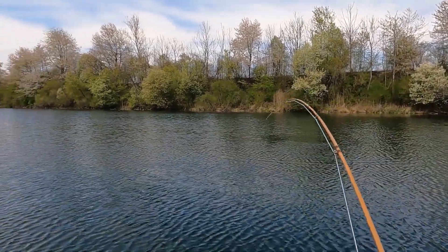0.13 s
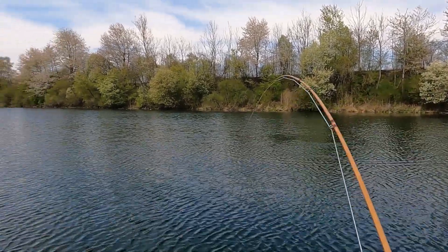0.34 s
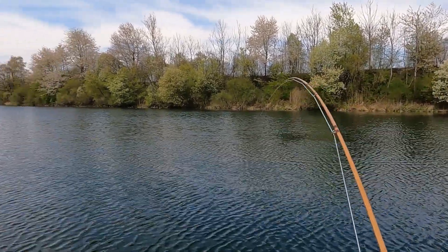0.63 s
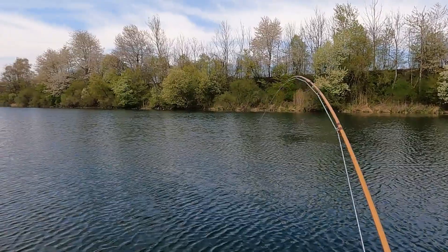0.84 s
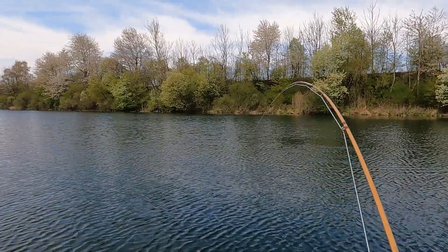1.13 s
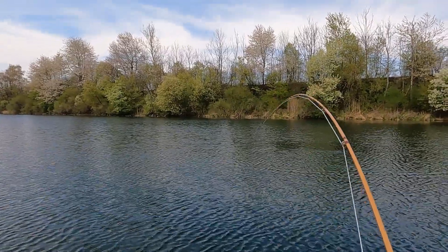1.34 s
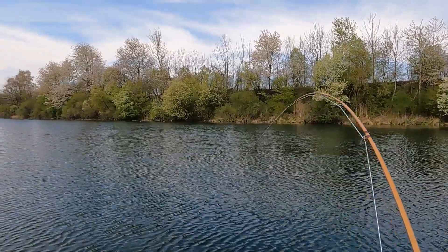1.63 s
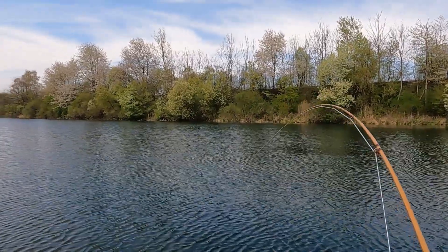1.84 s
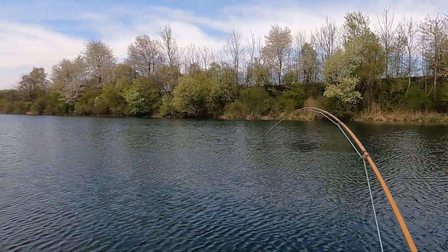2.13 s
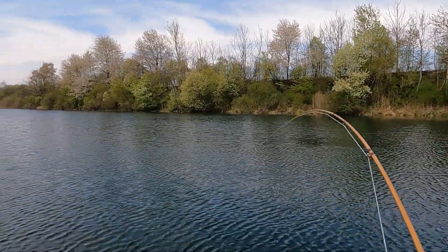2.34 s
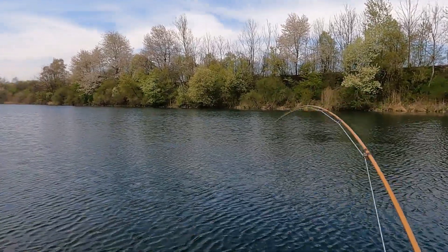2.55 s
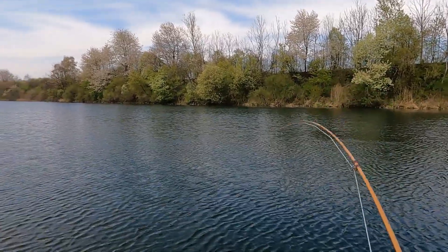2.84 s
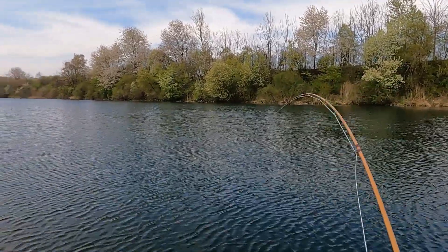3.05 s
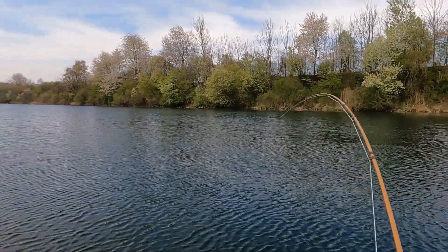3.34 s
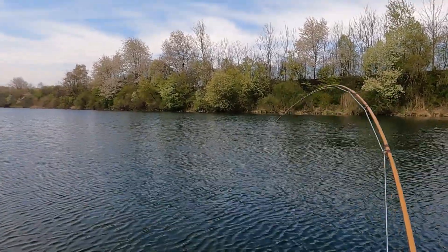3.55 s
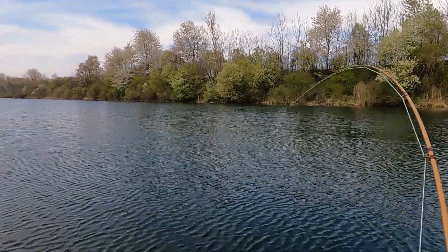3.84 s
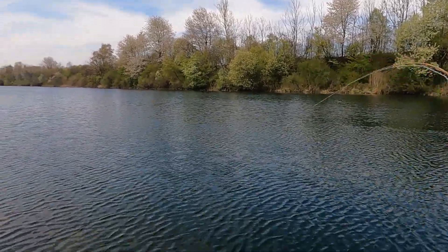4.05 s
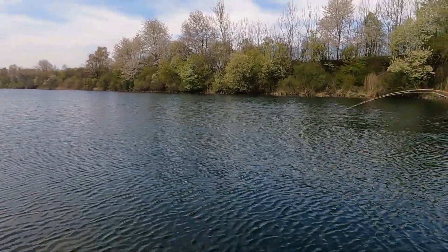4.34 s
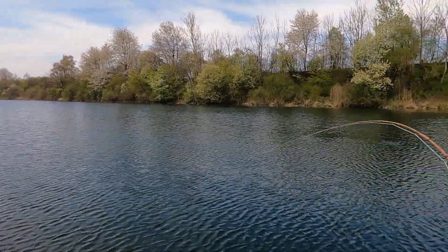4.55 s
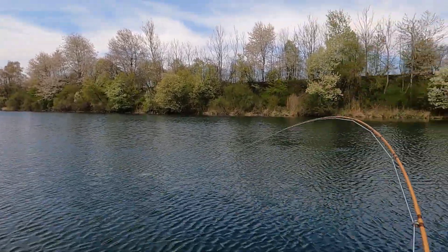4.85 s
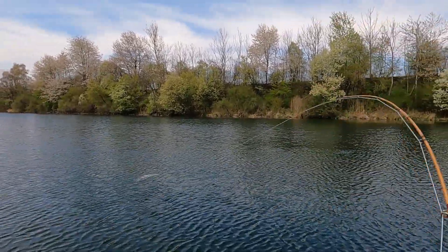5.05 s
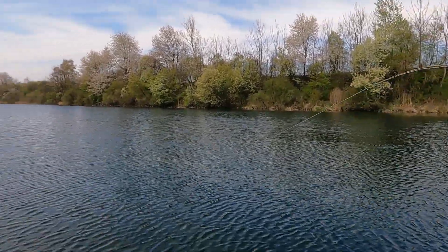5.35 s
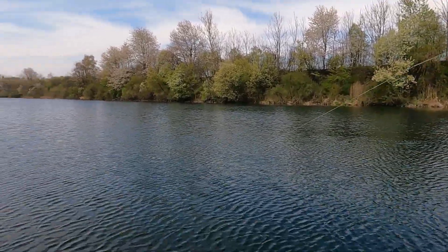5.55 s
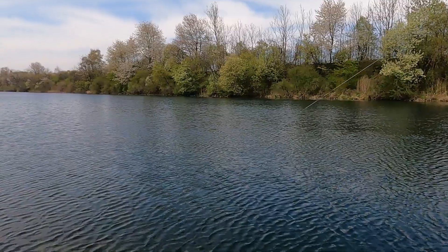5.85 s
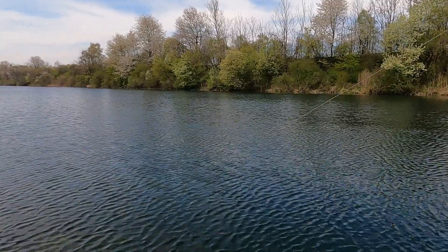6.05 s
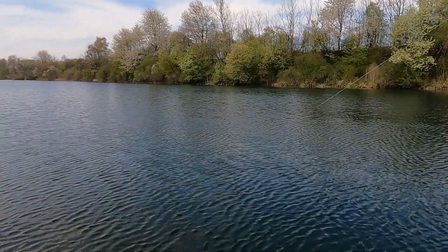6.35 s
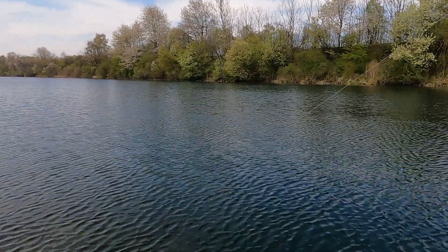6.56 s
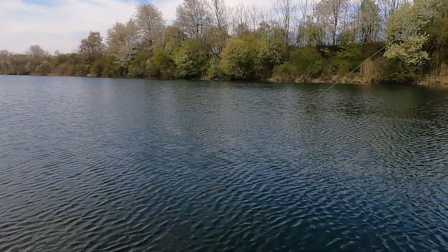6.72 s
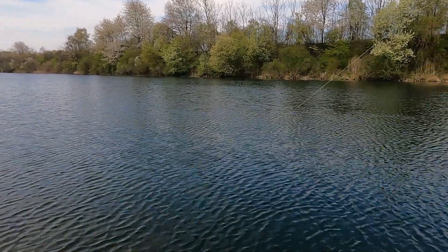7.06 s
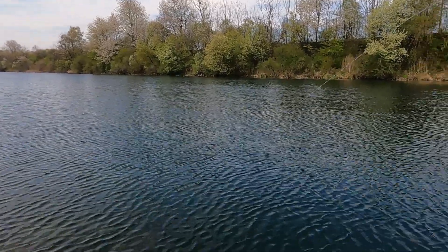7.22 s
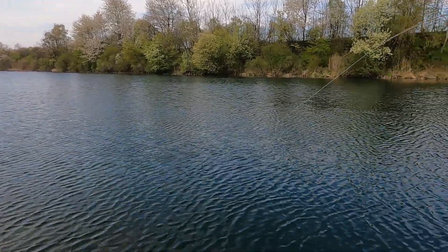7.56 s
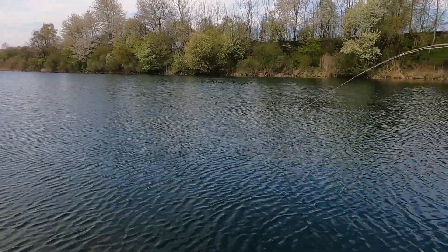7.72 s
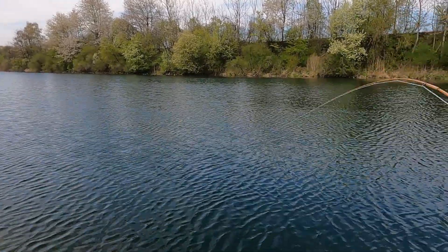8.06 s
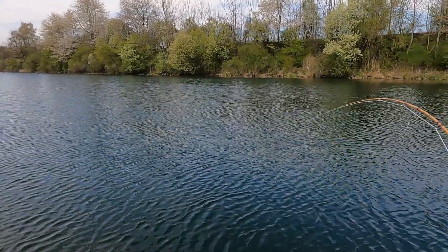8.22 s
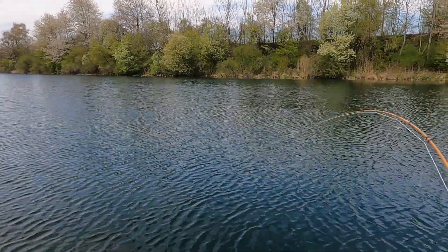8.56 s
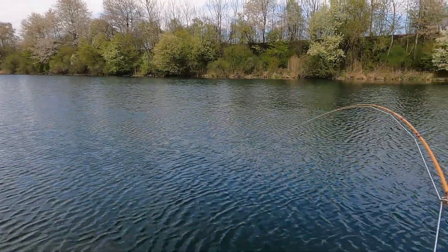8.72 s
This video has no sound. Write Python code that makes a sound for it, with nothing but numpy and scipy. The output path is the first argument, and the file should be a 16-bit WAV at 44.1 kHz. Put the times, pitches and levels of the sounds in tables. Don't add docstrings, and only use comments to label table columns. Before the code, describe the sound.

A dry, bright clicking reel at arm's length surges and eases as a hooked fish takes line. The long purr breaks into lone clicks, then a quieter gap of rustling sleeve and light wind. The reel runs again for nearly two seconds and falters. Isolated ticks and a bump on the microphone housing end it, with wind rumbling low. Open air, almost no echo.

```python
import sys
import numpy as np
from scipy import signal
from scipy.io import wavfile

SR = 44100
rng = np.random.default_rng(int(sys.argv[2]) if len(sys.argv) > 2 else 0)


def materialize(psi):
    bounded = np.clip(np.atleast_2d(psi).T, -1, 1)
    quanta = np.round(bounded * 32767).astype(np.int16)
    wavfile.write(sys.argv[1], SR, quanta)


def magnitude_from_level(level_db):
    exponent = np.asarray(level_db, float) / 20
    return 10 ** exponent


N = 392033

# start in seconds, then the level in dB
LONE_CLICKS = [(3.1774, -31.5, -36, -28, -30.5), (3.2211, -27, -33, -25, -37),
               (3.3632, -27.5, -33, -29.5, -31.5), (3.4884, -29, -36, -28.5, -30),
               (3.5988, -30, -33, -27.5, -30.5), (4.7159, -32.5, -34.5, -36.5, -32),
               (5.8517, -25.5, -31, -32.5, -33), (5.986, -27, -33, -31, -31),
               (6.1397, -24.5, -33, -31, -34.5), (8.4911, -28.5, -31.5, -29.5, -33.5),
               (8.6051, -33, -32.5, -32, -31), (8.6528, -33, -32, -30, -28.5),
               (8.6891, -28.5, -37, -29, -32.5), (8.725, -26.5, -32.5, -27.5, -35.5)]
# start in seconds, teeth passed, teeth per second at the start,
# lateness of the fastest moment [exponent].
FIRST_TUGS = [(0.0015, 9, 58, 1.15), (0.1364, 10, 44, 0.77), (0.2806, 8, 62, 0.67), (0.4039, 9, 56, 0.82),
              (0.5361, 13, 55, 1.02), (0.7077, 8, 77, 1.21), (0.8032, 12, 66, 0.72), (0.9518, 13, 30, 0.8),
              (1.1039, 9, 62, 1.23), (1.2211, 9, 58, 1.02), (1.3388, 10, 58, 0.61), (1.4901, 13, 41, 0.53),
              (1.6753, 18, 70, 0.67), (1.9179, 15, 54, 1.06), (2.1159, 13, 66, 0.75), (2.2789, 7, 67, 0.4),
              (2.3826, 17, 64, 1.26), (2.6179, 12, 55, 1.28), (2.7844, 14, 73, 0.74), (2.9701, 0, 44, 2.49)]


def rms_one(x):
    return x / np.sqrt(np.mean(x ** 2) + 1e-20)


def in_time(rows):
    s, *columns = np.transpose(rows)
    return [np.interp(np.arange(N) / SR, s, column) for column in columns]


def at_hz(points, hz):
    table_hz, value = np.array(points)[:, 0], np.array(points)[:, 1]
    return np.interp(np.log(hz), np.log(table_hz), value)


def drift(rate):
    pole = np.exp(-80 * np.pi * rate / SR)
    white = rng.standard_normal(N // 40 + 2002)
    slow = signal.lfilter([1], [1, -2 * pole, pole * pole], white)[2000:]
    return np.interp(np.arange(N) / 40, np.arange(len(slow)), rms_one(slow))


def ring(clicks, hz, t60):
    radius, angle = magnitude_from_level(-60 / (t60 * SR)), 2 * np.pi * hz / SR
    poles = [1, -2 * radius * np.cos(angle), radius * radius]
    return signal.lfilter([0, np.sin(angle)], poles, clicks + 1e-18)


def air(spectrum, patchy_db, flicker, near=0):
    # frequency in Hz, left-right likeness from 0 to 1.
    likeness = [(40, .88), (300, .86), (1400, .78), (4000, .7), (12000, .55)]
    low, high = spectrum[0][0], spectrum[-1][0]
    edges = np.geomspace(low, high, int(2 * np.log2(high / low)) + 2)
    white = rng.standard_normal((2, 2, N + 8000))
    out = 0
    for k, band in enumerate(zip(edges, edges[1:])):
        bandpass = signal.butter(2, band, "band", fs=SR, output="sos")
        mid, side = signal.sosfilt(bandpass, white[k % 2])[:, -N:]
        hz = np.sqrt(band[0] * band[1])
        alike = max(at_hz(likeness, hz), near)
        gain = magnitude_from_level(at_hz(spectrum, hz) + patchy_db * drift(flicker))
        out = out + gain * (np.sqrt(1 + alike) * mid + np.sqrt(1 - alike) * side * [[1], [-1]])
    return rms_one(out)


def kin(shape, alike):
    alike = np.clip(alike, 0, .97)
    return signal.lfilter([np.sqrt(1 - alike ** 2)], [1, -alike], rng.standard_normal(shape), axis=-2)


def teeth(tugs):
    drops = []
    u = np.linspace(0, 1, 400)
    for (s, count, rate, late), (end, _, end_rate, _) in zip(tugs, tugs[1:]):
        slack = rate + (end_rate - rate) * u
        surge = np.sin(np.pi * u ** late) ** 2
        turned = np.cumsum(slack + surge * (count / (end - s) - slack.mean()) / surge.mean())
        turned -= turned[0]
        drops += list(np.interp(np.arange(count), count * turned / turned[-1], s + (end - s) * u))
    return drops + [tugs[-1][0]]


def running():
    # start in seconds, teeth passed, teeth per second at the start,
    # lateness of the fastest moment [exponent].
    second_tugs = [(6.3008, 20, 57, 2.2), (6.5448, 15, 60, 0.94), (6.7281, 8, 70, 1.14),
                   (6.8204, 13, 85, 0.7), (6.9485, 9, 69, 0.99), (7.0588, 6, 70, 0.4),
                   (7.1487, 17, 54, 0.77), (7.3341, 9, 54, 0.88), (7.47, 8, 39, 0.66),
                   (7.5697, 12, 84, 0.92), (7.7217, 0, 29, 1.0)]
    stutter = [7.7417, 7.7626, 7.7846, 7.8044, 7.8252, 7.8555, 7.8926, 7.9515, 7.9733, 7.998, 8.0313,
               8.0691]
    stutter_loss_db = (1.5, -4.5, 3.5, -0.8)
    # swing once a turn in dB, its peak in turns,
    # swing twice a turn in dB, its peak in half turns.
    wobble = [
        (0.36, 0.96, 1.1, 0.36),
        (1, 0.54, 3, 0.86),
        (1.13, 0.95, 0.37, 0.095),
        (1.9, 0.49, 0, 0.38),
    ]
    # spool angle at the start in turns, then cage, foot, spool ring and pawl in dB.
    runs = [
        (.001, -26.5, -47, -31, -39.5),
        (.08, -28, -46, -32.5, -41.5),
    ]
    speed_db = (0.38, 1.7, 2.6, -.4)
    teeth_per_turn, usual_teeth_per_s = 32, 75

    once_db, once_at, twice_db, twice_at = np.transpose(wobble)
    rows = []
    for s, (angle, *level_db) in zip((teeth(FIRST_TUGS), teeth(second_tugs) + stutter), runs):
        turns = angle + np.arange(len(s))[:, None] / teeth_per_turn
        colour_db = once_db * np.cos(2 * np.pi * (turns - once_at))
        colour_db = colour_db + twice_db * np.cos(2 * np.pi * (2 * turns - twice_at))
        octaves = np.log2(1 / np.gradient(s)[:, None] / usual_teeth_per_s)
        rows.append(np.column_stack([s, level_db + colour_db + octaves * speed_db]))
    rows = np.vstack(rows)
    rows[-len(stutter):, 1:] -= stutter_loss_db
    return rows


def pawl(rows, body, chatter_s, alike, count=5):
    # boost in dB, bounce in dB relative to the main blow.
    parts = [
        (6, -8),
        (8.5, -11),
        (4.5, -21),
        (6.5, -1),
    ]
    mode_spread_db, wander_db, side_db = 1.2, 1.6, -18
    bounces = np.linspace(.05, .9, count - 1) + .12 * kin((len(rows), count - 1), alike)
    place = np.column_stack([np.full(len(rows), .2), np.clip(bounces, 0, 1)])
    at = ((rows[:, :1] + place * chatter_s) * SR).astype(int)
    out = np.zeros((2, N))
    for part, (modes, (boost_db, bounce_db)) in enumerate(zip(body, parts)):
        for k, (hz, level_db, t60) in enumerate(modes):
            spread_db = mode_spread_db * rng.standard_normal(len(rows))
            size = magnitude_from_level(rows[:, part + 1] + boost_db + level_db + spread_db)
            size *= magnitude_from_level(wander_db * drift(3)[at[:, 0]])
            mid, side = kin((2, len(rows), count), alike)
            main_blow = np.full(len(rows), -(-1) ** k)
            mid = np.column_stack([main_blow, magnitude_from_level(bounce_db) * mid[:, 1:]])
            clicks = np.zeros((2, N))
            for ear, sign in enumerate((1, -1)):
                np.add.at(clicks[ear], at, size[:, None] * (mid + sign * magnitude_from_level(side_db) * side))
            out += ring(clicks, hz, t60)
    return out


def reel():
    # frequency in Hz, level in dB, t60 in seconds.
    cage_modes = [(4640, -19.5, 0.0028), (4650, -20, 0.026), (5090, -10, 0.0085), (5830, -6.5, 0.0027),
                  (6330, -16, 0.0079), (7120, -10.5, 0.0047)]
    foot_modes = [(1060, -20, 0.043), (1278, -14, 0.024), (1882, -4.5, 0.015), (2108, 1, 0.011),
                  (2591, -11.5, 0.042)]
    spool_modes = [(3470, -4.5, .006), (3060, -17, .015), (3410, -7.5, .04), (3610, -13, .03)]
    pawl_modes = [(8290, -1, 0.0026), (9080, -3.5, 0.0054), (9700, -11.5, 0.0074), (10870, -9.5, .007),
                  (11600, -13.5, 0.015), (12500, -11, 0.0048), (13800, -29.5, .003)]
    # frequency in Hz, level in dB, t60 in seconds.
    cage_creep = [(4300, -20, 0.035), (5060, -11, 0.015), (6010, -7.5, 0.0095), (6490, -8.5, 0.016),
                  (7650, -1, 0.0049)]
    foot_creep = [(1030, -29.5, 0.045), (1510, -12, 0.0017), (2080, -5, 0.015), (2540, -14.5, 0.023)]
    spool_creep = [(2980, -7, 0.015), (3400, -5, 0.039), (3630, 2, 0.0035), (3630, -2, 0.024)]
    pawl_creep = [(8530, -6, 0.009), (9300, -6.5, 0.0069), (10800, 2, 0.0023), (11300, -4.5, 0.0033),
                  (11800, -13, 0.018), (13600, -21, .003)]

    lighter = [(hz * 1.018, level_db, t60) for hz, level_db, t60 in spool_modes]
    rows = running()
    late = rows[:, 0] > FIRST_TUGS[-1][0]
    fast = 0
    for run, spool in ((rows[~late], spool_modes), (rows[late], lighter)):
        fast = fast + pawl(run, (cage_modes, foot_modes, spool, pawl_modes), chatter_s=.0022, alike=.8)
    creep = (cage_creep, foot_creep, spool_creep, pawl_creep)
    slow = pawl(np.array(LONE_CLICKS), creep, chatter_s=.0011, alike=0)
    fast = fast + magnitude_from_level(-21.5) * np.roll(fast, round(0.0061 * SR), axis=1)
    return signal.sosfilt(signal.butter(2, 900, "high", fs=SR, output="sos"), fast + slow)


def shiver():
    dying = 0
    for rows, level_db, t60 in ((running(), -11, .045), (np.array(LONE_CLICKS), -11, .018)):
        kicks = np.zeros(N)
        kicks[(rows[:, 0] * SR).astype(int)] = magnitude_from_level(rows[:, 1] + level_db)
        dying = dying + signal.lfilter([1], [1, -magnitude_from_level(-60 / (t60 * SR))], kicks + 1e-18)
    # frequency in Hz, level in dB per Hz
    colour = [(1500, -28.5), (2600, -11), (3400, 1), (5200, -14), (7500, -11.5), (9100, -12.0), (13000, -17.5)]
    return dying * air(colour, patchy_db=1.5, flicker=40, near=.93)


def shore():
    # frequency in Hz, level in dB per Hz.
    shore_colour = [(150, -2.5), (300, -11), (800, -14.5), (1300, -17.5), (2600, -37.5), (5000, -35),
                    (12000, -60)]
    return magnitude_from_level(-59.5) * air(shore_colour, patchy_db=1.5, flicker=5.7)


def swell(s, half, db):
    return magnitude_from_level(db) * np.exp(-.5 * ((np.arange(N) / SR - s) / half) ** 2)


def wind():
    # time in seconds, level in dB.
    breeze = [(0, -46), (2.8, -44.5), (4.3, -49.5), (5.6, -49), (6.5, -62), (7.0, -55), (7.6, -49.5),
              (8.89, -44)]
    # middle in seconds, half length in seconds, level in dB,
    # upper rumble in dB relative to it.
    gust_rows = [(.02, 0.18, -45.5, -25), (.9, 0.1, -55, 0), (1.21, 0.27, -43, -9),
                 (1.98, 0.023, -39.5, -29), (2.31, 0.053, -40, -21), (2.52, 0.049, -36.5, -28),
                 (2.97, 0.065, -49.5, -8), (3.56, 0.023, -43.5, -11), (4.98, 0.04, -54.5, -9),
                 (5.52, 0.12, -74.5, -1), (7.24, 0.2, -46, -28), (7.88, 0.078, -44.5, -17),
                 (8.57, 0.051, -31, -8.5), (8.8, 0.14, -32.5, -17)]
    # frequency in Hz, level in dB per Hz.
    deep_colour = [(12, 1), (37, 4), (90, -10.5), (130, -18.5)]
    upper_colour = [(45, -28), (65, 3), (180, -11), (300, -22)]

    deep, upper = magnitude_from_level(in_time(breeze)[0]), magnitude_from_level(-55.5)
    for s, half, db, upper_db in gust_rows:
        gust = swell(s, half, db)
        deep = deep + gust
        upper = upper + gust * magnitude_from_level(upper_db)
    rumble = deep * air(deep_colour, patchy_db=2.0, flicker=5.8)
    rumble = rumble + upper * air(upper_colour, patchy_db=6.0, flicker=3.26)
    return (rumble + knocks()) * magnitude_from_level([[-2], [2]])


def knocks():
    # middle in seconds, half width in seconds, peak in dB.
    knock_rows = [
        (8.566, 0.01, -26),
        (8.592, 0.0035, -18),
        (8.795, 0.0081, -27),
    ]
    t = np.arange(N) / SR
    return sum((1 - ((t - s) / width) ** 2) * swell(s, width, peak_db) for s, width, peak_db in knock_rows)


def housing_hum():
    # middle in seconds, half length in seconds, level in dB.
    puff_rows = [(.2, 0.14, -51), (1.7, 0.19, -60), (2.3, 0.12, -55.5), (2.6, 0.11, -58),
                 (4.05, 0.12, -58.5), (4.8, 0.077, -62), (5.15, 0.35, -67.5), (6.62, 0.09, -58.5),
                 (7.5, 0.099, -62), (8.08, 0.11, -57.5)]
    puffs = sum(swell(s, half, db) for s, half, db in puff_rows)
    return puffs * rms_one(ring(rng.standard_normal(N), 317.0, 0.098))


def sleeve():
    # peak in seconds, rise in dB per second, fall in dB per second, peak in dB,
    # sheen in dB over the dull rub.
    swings = [(.27, 29, 87.5, -51.5, -4), (1.66, 38, 68, -52.5, 2.5), (2.27, 70, 20.5, -55, -2.5),
              (3.97, 57, 49, -49.5, -2), (4.9, 28, 19, -59.5, -42), (5.82, 38, 25, -58.5, -1),
              (6.5, 24, 5.5, -54, -33), (6.3, 32, 5, -90.5, 11), (8.05, 3, 94, -72.5, 9),
              (8.591, 900, 37, -78, 15.5), (8.7, 67, 150, -76, 14), (8.8, 61, 61, -70, -10)]
    # frequency in Hz, level in dB per Hz.
    dull_colour = [(250, -5), (500, -8), (1000, -11)]
    middle_colour = [(900, 10), (1300, 12), (2200, 5), (3500, -19.5)]
    bright_colour = [(1530, -33.5), (2600, 2), (4720, -2.5), (5860, -7), (7430, -5), (12000, -32),
                     (14500, -30.5)]
    bright_below_db, bright_steeper, rounded = 3, 1.09, 1.454

    t = np.arange(N) / SR
    rub, middle, bright = 0, 0, 0
    for s, rise, fall, peak_db, sheen_db in swings:
        away_db = np.maximum(rise * (s - t), fall * (t - s)) ** rounded / 4
        rub = rub + magnitude_from_level(peak_db - away_db)
        middle = middle + magnitude_from_level(peak_db + sheen_db - away_db)
        bright = bright + magnitude_from_level(peak_db + sheen_db - bright_below_db - bright_steeper * away_db)
    dull = magnitude_from_level(-5.5) * rub * air(dull_colour, patchy_db=3.0, flicker=29)
    sheen = middle * air(middle_colour, patchy_db=1.7, flicker=8.3)
    return dull + sheen + bright * air(bright_colour, patchy_db=1.6, flicker=30)


def spring():
    # start in seconds, pitch in Hz, level in dB, t60 in seconds, octave in dB over the tone.
    songs = [(3.224, 3760, -54, .07, 7), (3.366, 3770, -50, .11, -8), (3.491, 3780, -53, .07, -6),
             (3.602, 3790, -42, .21, -14), (4.718, 3820, -40, .14, -9), (5.854, 3770, -45, .1, -15),
             (5.989, 3785, -48, .12, -14), (6.142, 3800, -52, .06, -13), (8.494, 3780, -54, .06, -6),
             (8.608, 3785, -53, .06, -12), (8.655, 3800, -49, .07, -10), (8.692, 3800, -45, .06, -15),
             (8.727, 3780, -45, .07, 1)]
    out = np.zeros(N)
    for s, hz, level_db, t60, octave_db in songs:
        t = np.arange(round(.7 * t60 * SR)) / SR
        phase = 2 * np.pi * hz * t * (1 + .003 * np.sin(9 * t / t60))
        tone = np.sin(phase)
        tone += magnitude_from_level(octave_db) * np.sin(2 * phase)
        tone += magnitude_from_level(octave_db - 14) * np.sin(3 * phase)
        tone += magnitude_from_level(-35.5) * np.sin(3.29 * phase)
        shape = np.minimum(t / .003, 1) * np.sqrt(1 - t / t[-1])
        out[round(s * SR):][:len(t)] += magnitude_from_level(level_db + 6.5 - 60 * t / t60) * shape * tone
    return out * magnitude_from_level([[.5], [-.5]])


def ticks():
    # start in seconds, peak in dB, frequency in Hz.
    tick_rows = [(3.278, -56, 3000), (3.795, -50, 3900), (5.107, -49, 5000), (5.107, -56, 8500),
                 (5.23, -62, 7000), (5.815, -46, 3500), (8.21, -62, 10000), (8.56, -62, 7500)]
    return sum(ring(magnitude_from_level(db) * (np.arange(N) == round(s * SR)), hz, .006) for s, db, hz in tick_rows)


def line_hiss():
    # time in seconds, level in dB.
    slide = [(8.14, -90), (8.19, -72), (8.26, -72), (8.29, -82), (8.36, -72), (8.43, -82), (8.5, -95)]
    return magnitude_from_level(in_time(slide)[0]) * rms_one(ring(rng.standard_normal(N), 5000, .006))


def scene():
    close = reel() + shiver() + spring() + ticks() + sleeve() + line_hiss()
    return close + wind() + housing_hum() + shore()


def low_pass(x):
    return signal.sosfilt(signal.butter(12, 16480, fs=SR, output="sos"), x)


def record(dry):
    left = signal.lfilter([.33, 1], [1, .33], dry[0])
    right = signal.lfilter([.9, .1], [1], dry[1])
    roll_off = signal.butter(8, 14300, fs=SR, output="sos")
    mix = signal.sosfilt(roll_off, np.stack([left, right]))
    return low_pass(mix)


dry = scene()
out = record(dry)
materialize(out)
```